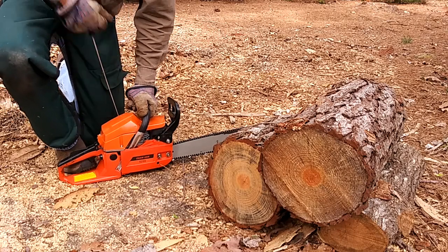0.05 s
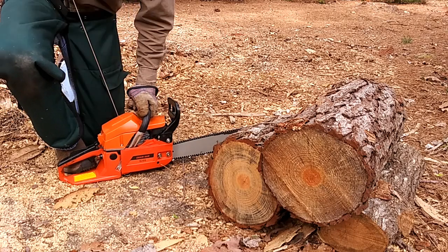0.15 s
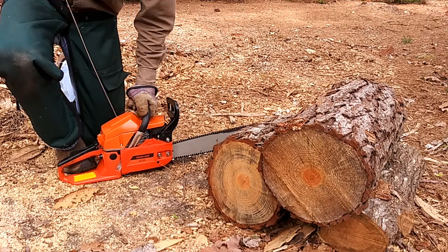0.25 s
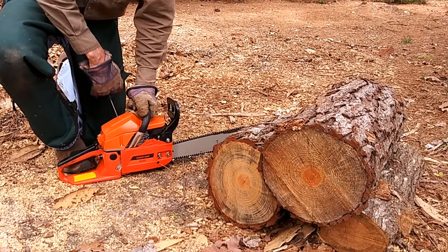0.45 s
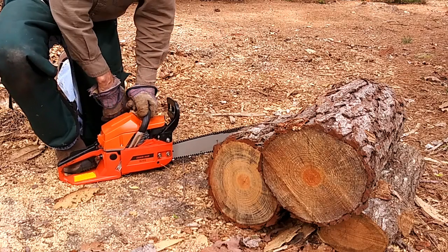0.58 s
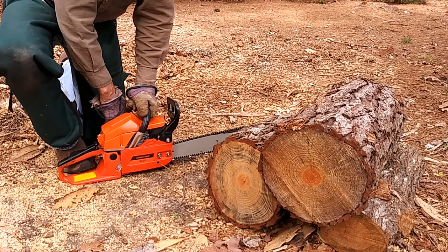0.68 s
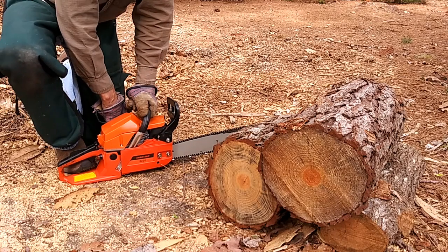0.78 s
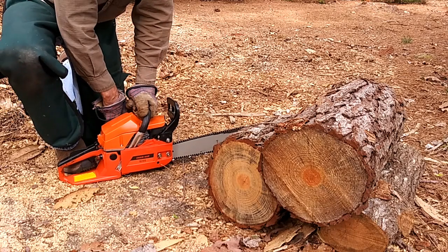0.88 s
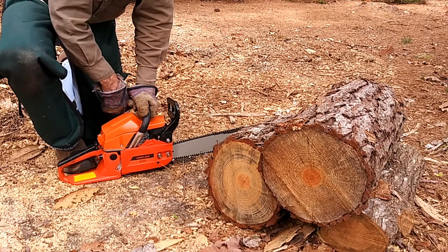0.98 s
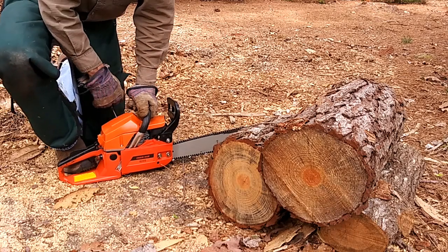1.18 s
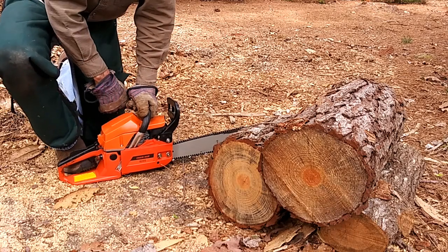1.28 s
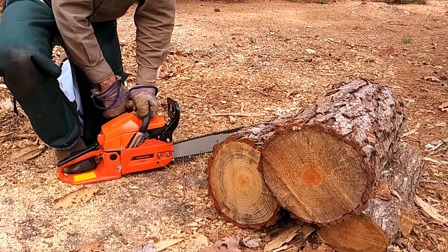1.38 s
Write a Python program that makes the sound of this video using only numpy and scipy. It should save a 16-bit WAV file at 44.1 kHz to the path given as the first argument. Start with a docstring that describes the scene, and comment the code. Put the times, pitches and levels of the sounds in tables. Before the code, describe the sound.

A chainsaw pull-start attempt: quick rope rasp, chugging clacks, falling whirr, clicks, and no ignition

```python
"""A chainsaw's starter rope is pulled once, outdoors, and the engine does not fire.
The rope rasps out (filtered noise grains), the piston puffs (damped pulses) and clacks (coloured noise bursts).
The flywheel whirrs as a gliding tone; slipping metal chirps in wavering high modes, once loudly.
Starter pawls click unevenly, then mostly at widening gaps as the flywheel coasts (noise snaps, ringing modes).
The handle knocks home on a few short modes, and the saw shifts a little on the ground."""
import sys
import numpy as np
from scipy import signal
from scipy.fft import rfft, irfft
from scipy.io import wavfile
from scipy.ndimage import uniform_filter1d

SR = 44100
rng = np.random.default_rng(int(sys.argv[2]) if len(sys.argv) > 2 else 0)


def store_wav(level_fs):
    """Save 16-bit WAV to argv[1]."""
    pcm = np.round(np.clip(np.atleast_2d(level_fs), -1, 1) * 32767)
    wavfile.write(sys.argv[1], SR, pcm.T.astype(np.int16))


N = 63945  # length in samples

# colour of the outdoor background: f/Hz, level/dB per Hz
AIR_COLOUR = [(25, -29), (55, -19), (90, 1.5), (320, -1), (550, 0.5), (850, 1.5), (1300, -3.5),
              (2000, -14.5), (8200, -25), (10000, -32.5), (16000, -46)]
AIR_DB = -57.5

# strength of the rope running out over its guide: t/s, level/dB
PULL_LEVEL = [(0.07, -70.5), (0.082, -45), (0.11, -49), (0.155, -39.5), (0.18, -50.5), (0.198, -40.5),
              (0.212, -30.5), (0.29, -27.5), (0.335, -36.5), (0.42, -43), (0.455, -45), (0.49, -46.5),
              (0.53, -47.5), (0.65, -73)]
# colour of the rope's rasp: f/Hz, level/dB
ROPE_COLOUR = [(60, -44.5), (170, -20), (330, -2), (500, 11), (750, 0), (1200, -2), (2700, -3),
               (4200, -8.5), (5500, -9), (7900, -4), (10000, -21), (16000, -45)]
ROPE_GRAINS_PER_S, ROPE_SCATTER_DB, ROPE_FLUTTER_DB = 5000, 1.5, 1

# thin squeaks and whines of the starter: t/s, length/s, start f/Hz, end f/Hz, level/dB
SQUEAKS_HEARD = [(0.033, 0.088, 2518, 3190, -57.5), (0.141, 0.071, 1666, 1605, -44.5),
                 (0.204, 0.054, 960, 790, -42.5), (0.334, 0.086, 706, 742, -40),
                 (0.745, 0.098, 2600, 2950, -57.5), (0.813, 0.068, 3480, 5200, -66.5),
                 (0.896, 0.047, 3400, 5200, -66.5)]
SQUEAK_WANDER = 0.015  # share of the starting pitch
SQUEAK_FLUTTER_DB = 5

# air puffs from the cylinder: t/s, level/dB, ring f/Hz, damping (width / pitch)
AIR_PUFFS = [(0.2131, -9, 210, 1), (0.2305, -16, 279, 1), (0.2481, -7.5, 241, 0.91),
             (0.2600, -23, 265, 0.55), (0.2776, -13.5, 246.6, 0.74), (0.2871, -21.5, 286, 0.27),
             (0.3110, -11, 219, 0.71), (0.3264, -17.5, 230.4, 0.66), (0.3656, -19, 154, 0.51),
             (0.3950, -28, 250, 0.3), (0.4290, -21.5, 191, 0.59), (0.4723, -29, 265, 0.34),
             (0.5170, -31, 216, 0.55), (0.53, -32.5, 169, 0.46)]
# clacks of the crank and starter at each compression: t/s, level/dB, tilt/dB per octave
CRANK_CLACKS = [(0.078, -43, -3), (0.205, -17.5, -5), (0.2300, -27, -2), (0.2382, -23, 1), (0.268, -21, 6),
                (0.277, -20, -2), (0.3017, -24, 1), (0.3445, -28, -6), (0.3743, -26.5, -6),
                (0.4175, -29.5, 0.5), (0.4264, -21.5, -7), (0.509, -23.5, -5)]
# colour of a clack: f/Hz, level/dB
CLACK_COLOUR = [(30, -69), (110, -20), (400, -14), (1100, -2), (2600, -5.5), (4000, -0.5), (5600, -14.5),
                (8000, -10.5), (10000, -13.5), (16000, -40.5)]
CLACK_FALL_S, CLACK_TAIL_DB, CLACK_TAIL_S = 0.0039, -23.5, 0.0066
CLATTER_GRAIN_DB = 1.5

# a faint bright scrape during the pull, then pawl clicks:
# t/s, level/dB, ring level/dB relative to the snap, tilt/dB per octave
SCRAPE_AND_CLICKS = [(0.1327, -46.5, -4, 7), (0.3454, -27, -0.5, 3.5), (0.35, -27, -6.5, -2),
                     (0.4040, -31.5, -2.5, -1), (0.4963, -35.5, -0.5, -2), (0.5139, -23, -7, -2.5),
                     (0.5354, -31.5, 3, 5.5), (0.5606, -27.5, -0.5, -1), (0.5959, -30.5, -4, -1),
                     (0.6524, -29.5, -11, 0.5), (0.7776, -26.5, -16, -0.5), (1.0370, -34.5, -11.5, -3.5),
                     (1.108, -47, -13, -3.5)]
# colour of the scrape and clicks: f/Hz, level/dB
PAWL_COLOUR = [(60, -41), (300, -19), (540, -2), (1000, -5.5), (1800, -3), (2800, 1.5), (4700, -7),
               (6300, 0), (8700, 8), (10300, -14), (12400, -10), (16000, -19.5)]
PAWL_HOLD_S, PAWL_FALL_S = 0.0039, 0.0026
# short modes of the plastic cover: f/Hz, level/dB, t60/s
COVER_MODES = [(555, -17.5, 0.094), (1773, -15, 0.068), (2355, -9, 0.026), (3445, -14, 0.025)]
# modes of the starter housing: f/Hz, level/dB, t60/s
HOUSING_MODES = [(540, -4.5, 0.16), (1805, -11.5, 0.18), (2660, -4.5, 0.11), (2910, -9, 0.19),
                 (3350, -3, 0.084), (3870, 3, 0.045), (5200, -4, .11), (5640, -7, 0.13), (6220, 1, 0.13),
                 (6910, -3, 0.085), (7240, 2.5, 0.13), (7480, -13, 0.081), (8550, 0.5, 0.082)]
STRIKE_SCATTER_DB, STRIKE_DETUNE = 2.5, 0.006  # detune is a share of the pitch
RING_WANDER_HZ, RING_BLUR = 34.7, 0.005  # pitch waver: a fixed part plus a share of the mode's pitch
RATTLE_DB, RATTLE_FALL_S, RATTLE_FLUTTER_DB = -8, 0.01742, 4

# whirr of the flywheel as it speeds up and slows: t/s, f/Hz, level/dB
WHIRR_COURSE = [(0.171, 446.4, -100), (0.212, 587, -45), (0.242, 696, -34), (0.281, 640.2, -45),
                (0.322, 525.1, -35), (0.34, 521.3, -52), (0.361, 495.2, -35.5), (0.384, 407, -44.5),
                (0.42, 362.7, -46), (0.7, 198, -78)]
WHIRR_OCTAVE_DB, WHIRR_WANDER_HZ = -7.5, 12
# colour of the air stirred by the flywheel: f/Hz, level/dB
RUSH_COLOUR = [(40, -19), (160, -3.5), (800, -6), (2000, -22), (16000, -78.5)]
RUSH_DB = -2  # relative to the whirr's fundamental

# chirps of metal slipping on metal: t/s, level/dB, length/s, pitch factor
METAL_CHIRPS = [(0.2140, -28, 0.0049, 1.06), (0.2765, -11.5, 0.0085, 1.0), (0.368, -25.5, 0.005, .955)]
# what the slipping metal rings with: f/Hz, level/dB, width/Hz
SLIP_MODES = [(5220, -14.5, 125), (5660, -10, 87), (6538, -1, 37), (7300, -7.5, 220), (7440, -2, 40),
              (7750, -7.5, 120), (8250, -14, 100)]
CHIRP_FALL_S, CHIRP_GRIT_DB, CHIRP_SATURATION = 0.0044, -11.5, 0.31

# strength of the rope and spring sliding back: t/s, level/dB
REWIND_LEVEL = [(0.485, -81), (0.505, -46), (0.56, -42), (0.615, -40), (0.645, -50), (0.68, -43.5),
                (0.715, -60), (0.88, -67.5), (0.98, -65.5), (1.15, -57), (1.24, -70.5), (1.45, -73.5)]
# colour of the sliding: f/Hz, level/dB
SLIDE_COLOUR = [(150, -16), (500, 2), (1000, 0), (2800, 2.5), (4700, -4), (6300, -4.5), (8200, -1),
                (10000, -16.5), (16000, -30.5)]

# handle knocks: t/s, level/dB
HANDLE_KNOCKS = [(0.8269, -31), (0.8435, -28), (1.204, -50)]
# modes of the handle against the casing: f/Hz, level/dB, t60/s
KNOCK_MODES = [(482, -12, 0.056), (633, -8, 0.037), (853, -1.5, .023), (1327, 0, 0.02), (1550, -6, 0.017)]
KNOCK_ATTACK_S, KNOCK_LOW_HZ = 0.00019, 357
KNOCK_GRIT_DB, KNOCK_GRIT_S = -9, 0.0067

# the saw shifts on the ground: t/s, level/dB, ring f/Hz, damping (width / pitch)
GROUND_BUMP = (1.1275, -41.5, 282, 0.8)

LOW_CUT_HZ, TOP_HZ = 116, 15900


def undb(db):
    """Decibels to gain."""
    return 10 ** (np.asarray(db) / 20)


def unit(x):
    """Scale to rms 1."""
    return x / np.sqrt(np.mean(x ** 2) + 1e-20)


def since(start):
    """Seconds since a moment, zero before it."""
    return np.maximum(np.arange(N) / SR - start, 0)


def curve(table):
    """Gain along a table of (t/s, level/dB)."""
    return undb(np.interp(since(0), *np.array(table).T))


def noise():
    """White noise."""
    return rng.standard_normal(N)


def colour(x, table, tilt=0):
    """Filter by (f/Hz, level/dB) points and a tilt in dB per octave; rms 1."""
    hz, db = np.array(table).T
    octave = np.log2(np.maximum(np.arange(N // 2 + 1) * SR / N, 1))
    gain = undb(np.interp(octave, np.log2(hz), db) + tilt * octave)
    return unit(irfft(rfft(x) * gain, N))


def flutter(db, size):
    """A gain that jumps about at random every few milliseconds; rms 1."""
    sway = np.clip(unit(uniform_filter1d(noise(), size=size)), -2, 2)
    return unit(undb(db * sway))


def burst(start, hold, fall, attack=0.00083):
    """Quick attack, hold, exponential release."""
    rise = 1 - np.exp(-since(start) / attack)
    return rise * np.exp(-since(start + hold) / fall)


def tone(hz, wander_hz):
    """A partial whose pitch wanders; rms 1."""
    drift = wander_hz * unit(uniform_filter1d(noise(), size=90))
    cycles = np.cumsum(hz + drift) / SR + rng.random()
    return np.sqrt(2) * np.sin(2 * np.pi * cycles)


def grains(rate, scatter_db, flutter_db):
    """Dense tiny slips of uneven size; each register rattles on its own."""
    hz = np.arange(N // 2 + 1) * SR / N
    register = np.minimum((np.sqrt(hz) / 16).astype(int), 6)  # bands widen towards the treble
    spectrum = 0
    for k in np.unique(register):
        size = undb(scatter_db * np.minimum(rng.exponential(size=N), 4))
        slips = (rng.random(N) < rate / SR) * noise() * size
        sway = undb(flutter_db * np.tanh(unit(uniform_filter1d(noise(), size=180))))
        spectrum = spectrum + rfft(slips * sway) * (register == k)
    return irfft(spectrum, N)


def clatter(table, tilt=0):
    """A swarm of tiny contacts, coloured; even strength over a few milliseconds."""
    contacts = noise() * undb(CLATTER_GRAIN_DB * unit(uniform_filter1d(noise(), size=30)))
    strength = np.sqrt(uniform_filter1d(contacts ** 2, size=200) + 1e-9)
    return colour(contacts / strength, table, tilt)


def thump(start, db, hz, damping, push_s=0.0006):
    """A soft pressure pulse through two damped chambers, scaled to its peak."""
    pulse = np.exp(-0.5 * ((since(0) - start) / push_s) ** 2)
    b, a = signal.iirpeak(hz, 1 / damping, fs=SR)
    once = signal.lfilter(b, a, pulse)
    twice = signal.lfilter(b, a, once)
    return undb(db) * twice / np.abs(twice).max()


def struck(start, modes):
    """Modes ringing from one blow; each blow weights and tunes them a little differently."""
    out = 0
    for hz, db, t60 in modes:
        louder, higher = rng.standard_normal(2)
        gain = undb(db + STRIKE_SCATTER_DB * louder)
        partial = tone(hz * (1 + STRIKE_DETUNE * higher), RING_WANDER_HZ + RING_BLUR * hz)
        out = out + gain * burst(start, 0, t60 / np.log(1000)) * partial
    return out


def background():
    """Quiet outdoor air: steady coloured noise."""
    return undb(AIR_DB) * colour(noise(), AIR_COLOUR)


def rope_pull():
    """The cord slips over its guide in dense uneven grains as it rasps out."""
    slips = grains(ROPE_GRAINS_PER_S, ROPE_SCATTER_DB, ROPE_FLUTTER_DB)
    return curve(PULL_LEVEL) * colour(slips, ROPE_COLOUR)


def squeaks():
    """The starter squeaks and whines thinly: fluttering tones that glide, swell and fade."""
    out = 0
    for start, length, from_hz, to_hz, db in SQUEAKS_HEARD:
        along = np.minimum(since(start) / length, 1)
        swell = np.sin(np.pi * along) * flutter(SQUEAK_FLUTTER_DB, size=400)
        whine = tone(from_hz + (to_hz - from_hz) * along, SQUEAK_WANDER * from_hz)
        out = out + undb(db) * swell * whine
    return out


def engine():
    """The piston pumps air through the muffler, and the crank clacks against each compression."""
    out = sum(thump(*row) for row in AIR_PUFFS)
    for start, db, tilt in CRANK_CLACKS:
        hit = burst(start, 0.00038, CLACK_FALL_S)
        tail = undb(CLACK_TAIL_DB) * burst(start, 0, CLACK_TAIL_S)
        out = out + undb(db) * (hit + tail) * clatter(CLACK_COLOUR, tilt)
    return out


def scrape_and_pawls():
    """After a faint scrape, pawls snap over teeth, ring cover and housing and rattle the spring."""
    out = 0
    total = np.sqrt(sum(undb(db) ** 2 for _, db, _ in HOUSING_MODES))
    for start, db, ring_db, tilt in SCRAPE_AND_CLICKS:
        snap = burst(start, PAWL_HOLD_S, PAWL_FALL_S, attack=0.0018) * clatter(PAWL_COLOUR, tilt)
        cover = struck(start, COVER_MODES)
        housing = struck(start, HOUSING_MODES) / total
        shake = burst(start, 0, RATTLE_FALL_S) * flutter(RATTLE_FLUTTER_DB, size=120)
        rattle = undb(RATTLE_DB) * shake * clatter(PAWL_COLOUR, tilt)
        out = out + undb(db) * (snap + cover + undb(ring_db) * (housing + rattle))
    return out


def flywheel():
    """The finned flywheel whirrs at a pitch that follows its speed, and stirs the air."""
    when, hz, db = np.array(WHIRR_COURSE).T
    pitch = np.interp(since(0), when, hz)
    gain = undb(np.interp(since(0), when, db))
    octave = undb(WHIRR_OCTAVE_DB) * tone(2 * pitch, WHIRR_WANDER_HZ)
    whirr = tone(pitch, WHIRR_WANDER_HZ) + octave
    rush = undb(RUSH_DB) * colour(noise(), RUSH_COLOUR)
    return gain * (whirr + rush)


def chirps():
    """Metal slips for a few milliseconds and sings in its high modes; friction bounds the swing."""
    out = 0
    for start, db, length, pitch in METAL_CHIRPS:
        ring = unit(sum(undb(mode_db) * tone(hz * pitch, width) for hz, mode_db, width in SLIP_MODES))
        swing = np.abs(signal.hilbert(ring))
        bounded = unit(ring / np.hypot(1, CHIRP_SATURATION * swing))
        grit = undb(CHIRP_GRIT_DB) * clatter(PAWL_COLOUR)
        out = out + undb(db) * burst(start, length, CHIRP_FALL_S) * (bounded + grit)
    return out


def rewind():
    """Rope and spring slide back in dense grains that flutter more than the pull."""
    slips = grains(ROPE_GRAINS_PER_S, scatter_db=1.5, flutter_db=2.5)
    return curve(REWIND_LEVEL) * colour(slips, SLIDE_COLOUR)


def handle():
    """The plastic grip knocks on the casing with a short, gritty, solid ring."""
    out = 0
    for start, db in HANDLE_KNOCKS:
        ring = 0
        for hz, mode_db, t60 in KNOCK_MODES:
            decay = burst(start, 0, t60 / np.log(1000), KNOCK_ATTACK_S)
            ring = ring + undb(mode_db) * np.sin(2 * np.pi * hz * since(start)) * decay
        grit = undb(KNOCK_GRIT_DB) * burst(start, 0, KNOCK_GRIT_S) * clatter(CLACK_COLOUR, tilt=-6.5)
        out = out + undb(db) * (ring + grit)
    return signal.sosfilt(signal.butter(4, KNOCK_LOW_HZ, "high", fs=SR, output="sos"), out)


def ground_bump():
    """The saw shifts a little on the ground: one soft, damped thump."""
    return thump(*GROUND_BUMP)


def scene():
    """The saw on open ground over a quiet background, as one channel."""
    pull = background() + rope_pull() + squeaks() + engine()
    starter = scrape_and_pawls() + flywheel() + chirps()
    ending = rewind() + handle() + ground_bump()
    return (pull + starter + ending)[None]


def record(dry):
    """Thin the deep bass gently and cut the top steeply."""
    thin = signal.sosfilt(signal.butter(1, LOW_CUT_HZ, "high", fs=SR, output="sos"), dry)
    return signal.sosfilt(signal.ellip(10, 0.2, 80, TOP_HZ, fs=SR, output="sos"), thin)


dry = scene()
out = record(dry)
store_wav(out)
```